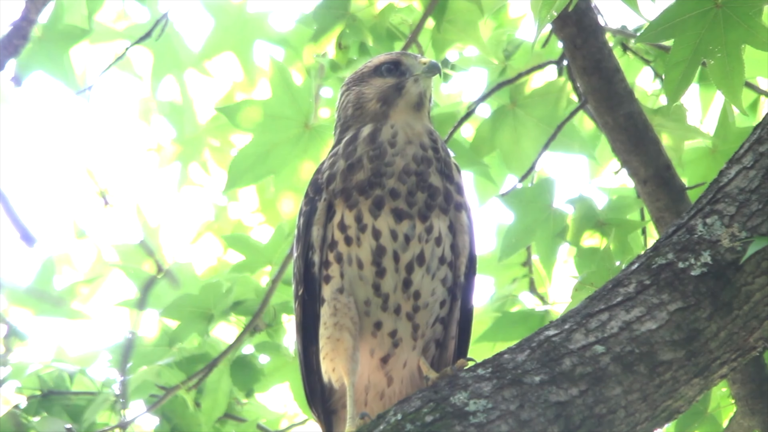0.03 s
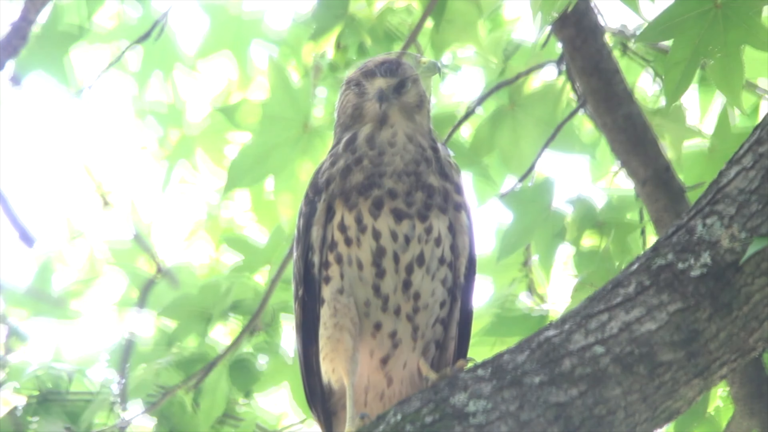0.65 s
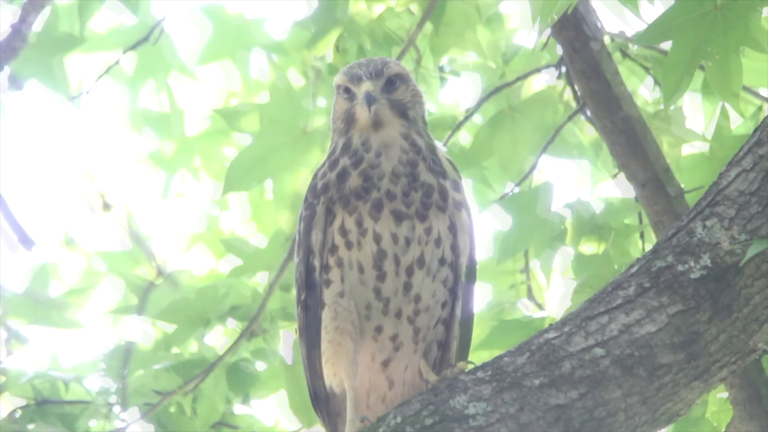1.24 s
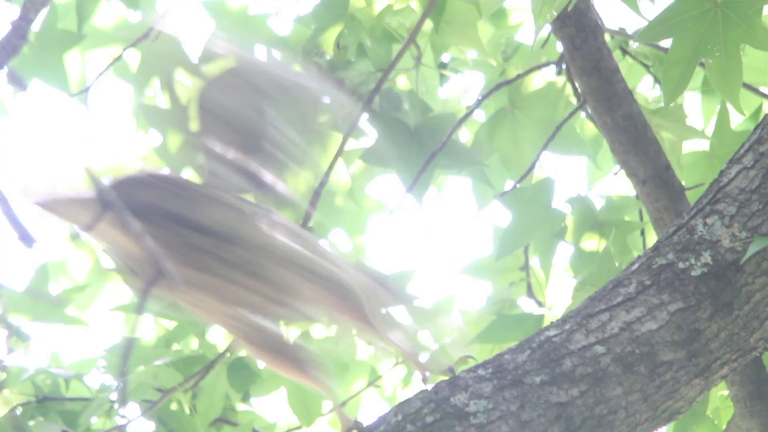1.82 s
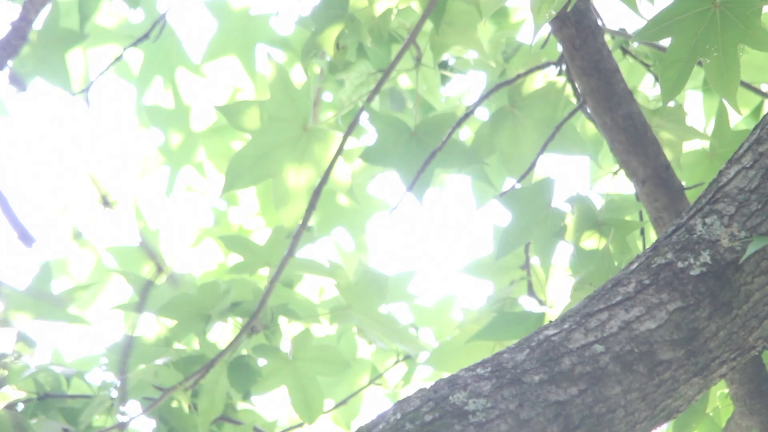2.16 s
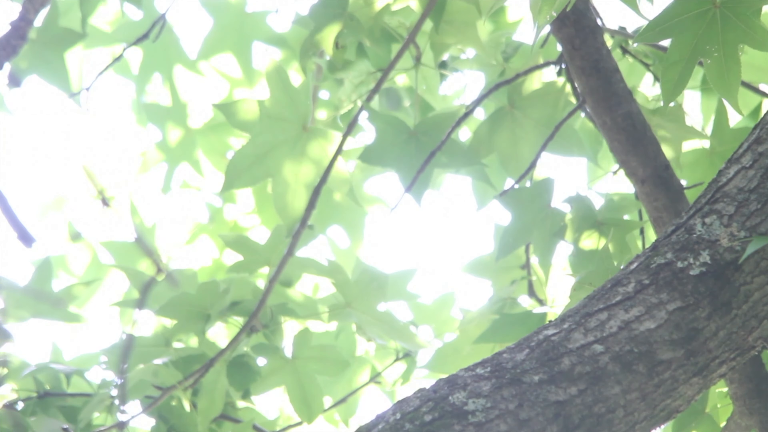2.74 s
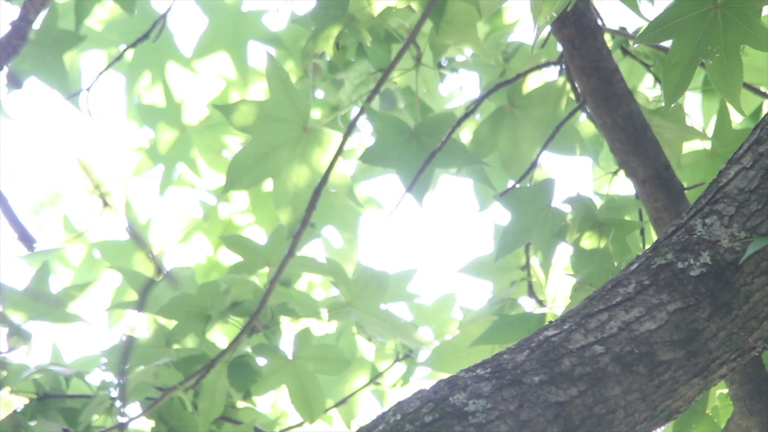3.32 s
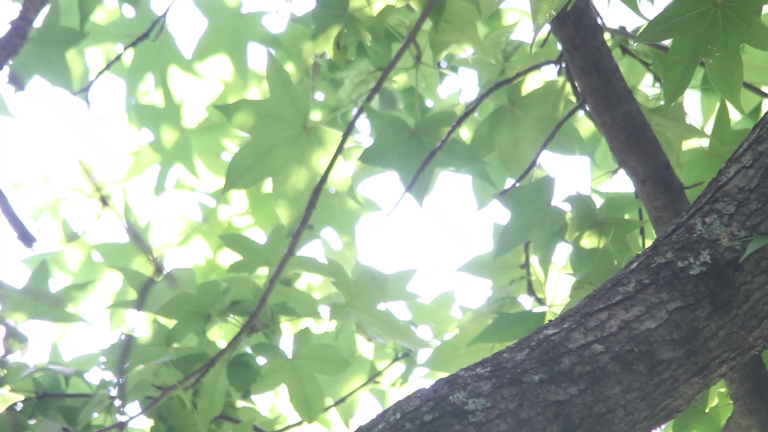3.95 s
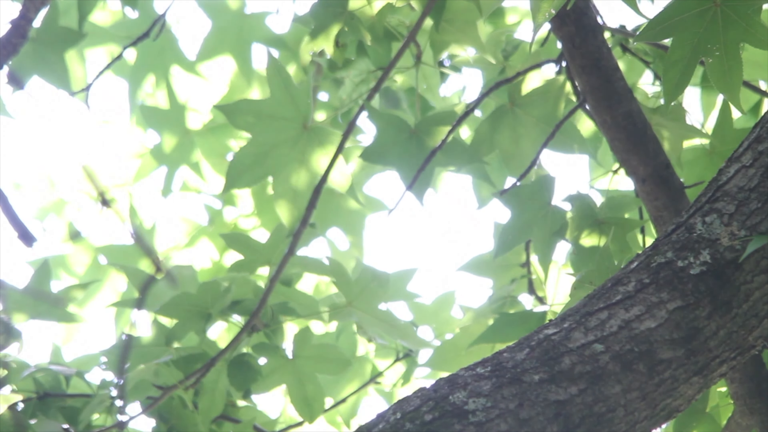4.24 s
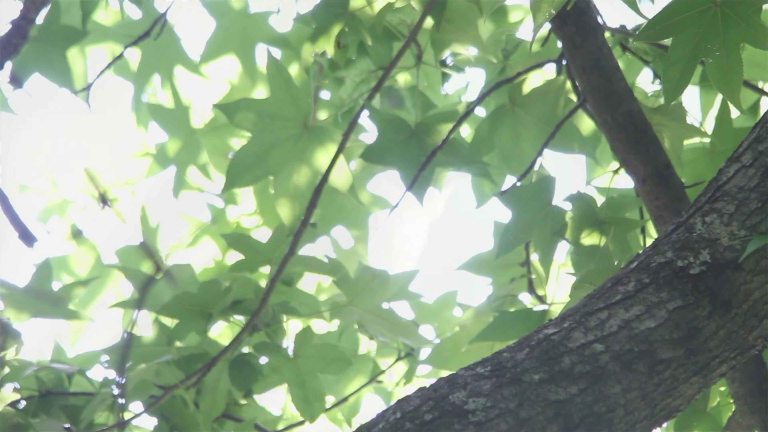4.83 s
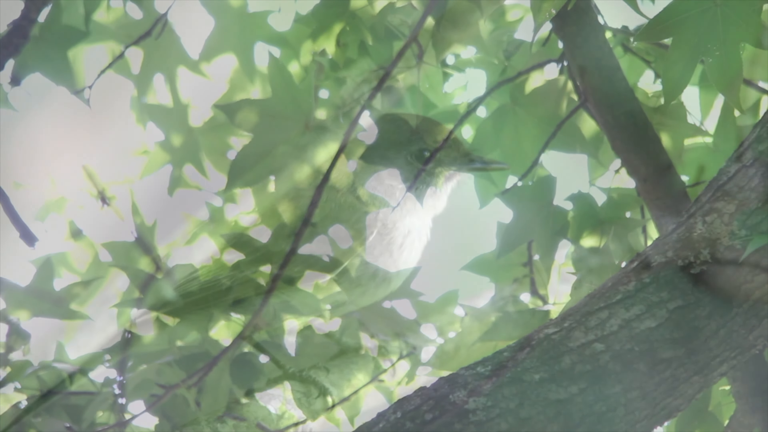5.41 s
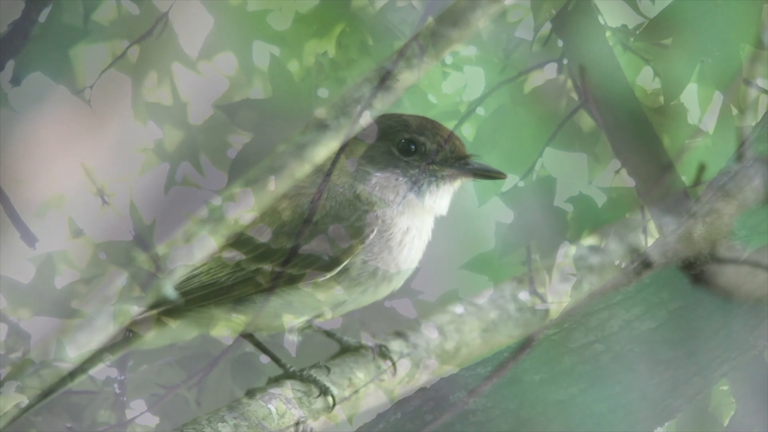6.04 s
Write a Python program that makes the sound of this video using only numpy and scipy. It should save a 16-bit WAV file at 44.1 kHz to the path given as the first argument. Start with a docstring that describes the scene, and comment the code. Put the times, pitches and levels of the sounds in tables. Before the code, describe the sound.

A young hawk calls in echoing woods over a quiet low rumble, a faint whine and a light high hiss. First come far-off cries and two thin falling whistles, the second louder. Five harsh screams follow, much closer to the microphone, each cracking from a high note down to a lower one, with three brief yelps after the first. The fifth scream sounds clearly farther away.

```python
"""Far screams and two thin falling whistles; then a young hawk screams five times in the woods, moving off.
Each scream swoops up, holds, then breaks to a lower register; the syrinx doubles or triples its
period and rasps. The first scream trails off in three low yelps.
Trunks and canopy echo the calls over a low distant rumble, a faint steady whine and a high hiss."""
import sys
import numpy as np
from scipy import signal
from scipy.fft import rfft, irfft, next_fast_len
from scipy.io import wavfile
from scipy.ndimage import uniform_filter1d, map_coordinates

SR = 44100
rng = np.random.default_rng(int(sys.argv[2]) if len(sys.argv) > 2 else 0)


def wav_record(signal):
    """Record a signal, one row per channel, as 16-bit PCM in the file named by sys.argv[1]."""
    frames = np.transpose(np.atleast_2d(signal))
    bounded = np.clip(frames, -1, 1)
    # unit amplitude maps onto the largest positive 16-bit level
    quanta = np.round(bounded * 32767).astype(np.int16)
    wavfile.write(sys.argv[1], SR, quanta)


N = 267907
TIME = np.arange(N) / SR
TOP_HZ = 15700


def amp(db):
    """dB to gain."""
    return 10 ** (np.asarray(db) / 20)


def unit(x):
    """Scale to rms 1."""
    return x / np.sqrt(np.mean(x ** 2) + 1e-20)


def ramp(x):
    """Clip to 0..1."""
    return np.clip(x, 0, 1)


def ease(x):
    """Smooth step, 0 to 1."""
    return np.sin(np.pi / 2 * ramp(x)) ** 2


def bump(x):
    """Gaussian, height 1."""
    return np.exp(-x ** 2 / 2)


def edges(t, edge_s=0.0041):
    """Soft-edged gate."""
    return ramp(np.minimum(t - t[0], t[-1] - t) / edge_s)


def along(points, hz):
    """Interpolate (f/Hz, value) points over log frequency."""
    f, values = np.transpose(points)
    return np.interp(np.log(hz + 1), np.log(f + 1), values)


def span(start_s, end_s):
    """Sample times of a call, and its progress 0..1."""
    t = np.arange(int(start_s * SR), int(end_s * SR)) / SR
    return t, np.linspace(0, 1, len(t))


def wobble(rate_hz, t):
    """Smooth random curve, rate_hz knots a second."""
    coarse = t[::12]
    curve = map_coordinates(rng.standard_normal(1024), [(coarse - t[0]) * rate_hz], mode="wrap")
    return np.interp(t, coarse, curve)


def drift(rate_hz, t):
    """Slow complex noise, rms 1; a narrow band when put on a carrier."""
    return (unit(wobble(rate_hz, t)) + 1j * unit(wobble(rate_hz, t))) / np.sqrt(2)


def noise(spectrum, count=N):
    """Noise of rms 1, coloured by (f/Hz, level/dB) points."""
    size = next_fast_len(count + 8192)
    gain = amp(along(spectrum, np.fft.rfftfreq(size, 1 / SR)))
    return unit(irfft(rfft(rng.standard_normal(size)) * gain, size)[:count])


def woods(level_db=-46):
    """Leaves and distant rumble: broad noise plus a low wandering band."""
    # Rumble and leaf spectrum: f/Hz, level/dB
    spectrum = [(22, -16), (50, 1), (95, 3), (150, 6), (250, 0), (400, -5), (800, -6), (1200, -10.5),
                (2000, -12.5), (3000, -14), (5000, -24), (8000, -29.5), (15500, -34)]
    # Distant drone: t/s, f/Hz, level/dB
    drone_path = [(0, 140, -51), (1.2, 154.5, -49.5), (2.4, 142.4, -63.5), (3.3, 155.7, -51.5),
                  (4.1, 177.1, -46), (4.7, 175.5, -47.5), (6.07, 164.7, -53.5)]
    bed = amp(level_db + 0.3 * wobble(1, TIME)) * noise(spectrum)
    times, *columns = np.transpose(drone_path)
    drone_hz, drone_db = (np.interp(TIME, times, column) for column in columns)
    carrier = np.exp(2j * np.pi * np.cumsum(drone_hz) / SR)
    return bed + np.sqrt(2) * amp(drone_db) * np.real(drift(55, TIME) * carrier)


def whine(level_db=-57, centre_hz=1473):
    """Faint steady tone, slightly wavering."""
    gain = amp(level_db + 0.77 * wobble(11, TIME))
    hz = centre_hz + 5 * wobble(40, TIME)
    return np.sqrt(2) * gain * np.sin(2 * np.pi * np.cumsum(hz) / SR)


def high_hiss(onset_s=.75, level_db=-62.5, edge_s=.025):
    """Faint hiss that sets in and swells in puffs."""
    # Hiss puffs: start/s, length/s, level/dB
    puffs = [(.77, 0.099, -65.5), (0.946, 0.29, -63.5), (1.353, 0.066, -55.5), (1.718, .12, -59.5)]
    gain = amp(level_db) * ease((TIME - onset_s) / edge_s)
    for start_s, length_s, db in puffs:
        inside_s = np.minimum(TIME - start_s, start_s + length_s - TIME)
        gain = np.hypot(gain, amp(db) * ease(inside_s / edge_s + .5))
    spectrum = [(2000, -8), (6000, -6.5), (9800, -10), (11200, -5), (13500, -8.5), (15500, -16.5)]
    return gain * noise(spectrum)


def among_trees(call, start_s, echo_db, near_db=-11, near_t60_s=0.06, build_s=0.0025):
    """A call placed at start_s: direct sound, scatter off nearby limbs, long tail of the wood."""
    # Forest decay: f/Hz, T60/s
    decay = [(300, 0.51), (1500, 0.92), (2500, 0.96), (5000, 1.0), (9000, 0.85), (15000, 0.35)]
    hz, frame_s, frames = signal.stft(rng.standard_normal(SR), SR, nperseg=256)
    frames = frames * amp(-60 * frame_s / along(decay, hz)[:, None])
    t = np.arange(SR) / SR
    tail = signal.istft(frames, SR, nperseg=256)[1][:SR] * (1 - np.exp(-t / build_s))
    near = rng.standard_normal(SR) * amp(-60 * t / near_t60_s) * (t > .003)
    path = amp(echo_db) * tail / np.linalg.norm(tail) + amp(near_db) * near / np.linalg.norm(near)
    path[0] = 1
    return np.pad(signal.fftconvolve(call, path), (round(start_s * SR), N))[:N]


def breath(phase, high, rasp, push, hiss_db, rasp_db=-11, low_share=0.59):
    """Air escaping in one puff a cycle: rasp in the throat, hiss at the beak."""
    # Throat turbulence: f/Hz, level/dB
    throat_air = [(500, -29), (1100, -16), (1500, 0.5), (1850, -13), (2400, -17), (2900, -7), (3350, -3.5),
                  (3800, -2.5), (4300, -3), (5400, -9), (6500, -5), (8200, -25), (11500, -28.5),
                  (15500, -53)]
    # Air past the open beak: f/Hz, level/dB
    beak_air = [(4000, -36), (7000, -46), (9500, 2), (11500, 7), (13500, 8), (15500, -6)]
    turbulence = rasp * (high + low_share * (1 - high)) + push
    throat = amp(rasp_db) * turbulence * noise(throat_air, len(phase))
    beak = amp(hiss_db - 4 - 2 * high) * (1 - push) * noise(beak_air, len(phase))
    return (throat + beak) * (1 + 0.59 * np.cos(phase))


def voice(t, pitch_hz, db, rasp, split, treble_db_oct, hiss_db, root_db=0, shrill_db=0,
          onset_db=5, onset_s=0.029, spent_s=0.041):
    """Syrinx harmonics through the throat; strain shakes the tone, splits its period and adds hiss."""
    # Throat and open beak response: f/Hz, gain/dB
    throat = [(800, -20.5), (970, -15), (1250, -12), (1600, -13.5), (1950, 0), (2450, 4.5), (3250, -6),
              (3750, -18), (4800, -16.5), (5600, -25.5), (6400, -16.5), (9300, -36.5), (11500, -49),
              (15500, -49)]
    break_hz, resonance_hz, fray_hz, shrill_hz = 1380, 2700, 7500, 9100
    effort_s, attack_s, jitter, waver = .08, 0.024, .006, 0.0067
    effort_db, rasp = uniform_filter1d([db, rasp], int(effort_s * SR), mode="nearest")
    surge_db = db - effort_db + 2.2 * wobble(47.7, t) + 2 * rasp * wobble(203.3, t)
    high = ramp(.5 + (pitch_hz - break_hz) / 120)  # 1: hoarse high register, 0: clearer low one
    hoarse = rasp * (high + .14 * (1 - high))
    fall_per_s = -np.gradient(np.log(pitch_hz)) * SR
    crack = uniform_filter1d(np.clip(fall_per_s / 11, 0, 2), 256)  # fast drops crack the voice
    push = np.exp(-(t - t[0]) / onset_s)  # first air: bright, unsteady
    spent = np.exp(-(t[-1] - t) / spent_s)  # air running out
    strain = rasp + 2 * push + 4 * spent
    hz = pitch_hz * (1 + jitter * strain * wobble(450, t) + waver * wobble(110.1, t))
    phase = 2 * np.pi * np.cumsum(hz) / SR

    def partial(k):
        """Line at k times the pitch: surges on the throat resonance, fades at random off it."""
        line_hz = k * pitch_hz
        resonant = np.exp(-np.log2(line_hz / resonance_hz) ** 2 / .25)
        level_db = effort_db + resonant * surge_db + (1 - resonant) * 3 * wobble(32.4, t)
        level_db += along(throat, line_hz) + treble_db_oct * np.log2(k / 2)
        level_db += root_db * (k == 1) + onset_db * push * (2 < k < 6)
        level_db += shrill_db * ease((line_hz - shrill_hz) / 2000 + .5)
        gain = np.sqrt(2) * amp(level_db) * (line_hz < TOP_HZ) / np.hypot(1, crack * k / 4)
        # Uneven cycles fray the line into a band, high lines most.
        fray = .9 * hoarse * min(k / 2, 1) + spent + line_hz ** 2 / (line_hz ** 2 + fray_hz ** 2)
        line = np.exp(1j * rng.uniform(0, 2 * np.pi)) + fray * drift(400 + 15 * k, t)
        return gain * np.real(line * np.exp(1j * k * phase)) / np.hypot(1, fray)

    # Period doubles in the high register, triples in the low.
    lowest = np.arange(1, 6)
    halves = amp(-8) * high * sum(map(partial, lowest + 1 / 2))
    thirds = amp(-8.5) * (1 - high) * sum(map(partial, np.r_[lowest + 2 / 3, lowest + 4 / 3]))
    tone = sum(map(partial, range(1, 12))) + split * (halves + thirds)
    air = amp(effort_db) * breath(phase, high, rasp, push, hiss_db)
    return edges(t) * ramp((t - t[0]) / attack_s) * (tone + air)


def far_screams():
    """Tails of distant screams, sagging and fading."""
    # Far calls: start/s, end/s, first f/Hz, last f/Hz, level/dB, fade/dB, rasp/0-1
    calls = [(0, .5, 1551, 1314, -46.5, 12.5, 0.17), (.62, 0.98, 1580, 1320, -56.5, 7, 0.5)]
    track = np.zeros(N)
    for start_s, end_s, first_hz, last_hz, db, fade_db, rasp in calls:
        t, progress = span(start_s, end_s)
        pitch_hz = last_hz + (first_hz - last_hz) * (1 - progress) ** 2.5
        call = voice(t, pitch_hz, db - fade_db * progress, np.full(len(t), rasp), split=0.04,
                     treble_db_oct=-2.5, hiss_db=-50, onset_db=-21)
        track += among_trees(call, start_s, echo_db=-4.5)
    return track


def whistle(t, pitch_hz, db, waver=0.0055, fray=0.038, chip_s=0.022, flutter_db=2.5):
    """Harsh chip, then a nearly pure tone."""
    # Whistle partials: harmonic number, level/dB
    harmonics = [(1, -2.5), (4, -40), (6, -35)]
    phase = 2 * np.pi * np.cumsum(pitch_hz * (1 + waver * wobble(222, t))) / SR
    tone = np.zeros(len(t))
    for k, level_db in harmonics:
        line = (1 + fray * drift(400, t)) * np.exp(1j * k * phase)
        tone += np.sqrt(2) * amp(level_db) * (k * pitch_hz < 13500) * np.real(line)
    chip = noise([(2400, -48), (3000, 0), (3600, -11), (4000, -14), (4600, -45)], len(t))
    chip *= amp(-1) * np.exp(-(t - t[0]) / chip_s)
    return edges(t) * amp(db + flutter_db * wobble(78.2, t)) * (tone + chip)


def whistles(chip_hz=937, drop_s=.006, resonance_hz=2087, steady_share=0.32, release_s=0.1):
    """Each falls in two flattening slides joined at a knee, and flares through a resonance."""
    # Whistles: start/s, knee/s, end/s, top f/Hz, knee f/Hz, last f/Hz, first slide exponent,
    # first level/dB, knee level/dB
    calls = [(0.409, 0.675, .96, 2960, 2234, 1593, 1.6, -49.5, -41.5),
             (1.152, 1.431, 1.644, 2990, 2194, 1560, 3.1, -34, -36.5)]
    track = np.zeros(N)
    for start_s, knee_s, end_s, top_hz, knee_hz, last_hz, bend, first_db, knee_db in calls:
        t, _ = span(start_s, end_s)
        before = ramp((knee_s - t) / (knee_s - start_s))
        after = ramp((end_s - t) / (end_s - knee_s))
        height = steady_share * before + (1 - steady_share) * before ** bend
        pitch_hz = last_hz + (knee_hz - last_hz) * after ** 1.3 + (top_hz - knee_hz) * height
        pitch_hz += chip_hz * np.exp(-(t - start_s) / drop_s)
        flare_db = 7.5 * bump((pitch_hz - resonance_hz) / 45)
        release_db = 12 * ramp(1 - (end_s - t) / release_s)
        db = knee_db + (first_db - knee_db) * before + flare_db - release_db
        track += among_trees(whistle(t, pitch_hz, db), start_s, echo_db=-9.5)
    return track


def yelps():
    """Short low notes after the first scream; each holds, then droops."""
    # Yelps: start/s, end/s, crest f/Hz, last f/Hz, level/dB, rasp/0-1, treble/(dB/oct)
    calls = [(2.574, 2.678, 960, 726, -31, 1, -4.5), (2.705, 2.77, 744, 701, -37.5, 1, -2.5),
             (2.763, 2.872, 793, 694, -35.5, 0, 1)]
    track = np.zeros(N)
    for start_s, end_s, crest_hz, last_hz, db, rasp, treble_db_oct in calls:
        t, progress = span(start_s, end_s)
        pitch_hz = crest_hz + (last_hz - crest_hz) * progress ** 5.4
        call = voice(t, pitch_hz, np.full(len(t), db), np.full(len(t), rasp), split=0.3,
                     treble_db_oct=treble_db_oct, hiss_db=-26.5, onset_s=.012, spent_s=0.03)
        track += among_trees(call, start_s, echo_db=-10.5)
    return track


def scream_contour(start_s, break_s, end_s, crest_hz, brink_hz, low_hz, last_hz, lift_hz,
                   accent_db, swell_db, high_db, low_db, high_rasp, low_rasp, split):
    """Voice controls for one scream: swoop to the crest, break, tiring low register."""
    # Brief falters on the crests: t/s, pitch drop/Hz, level drop/dB
    falters = [(2.245, 37.5, 3), (3.229, 44.5, -6), (3.99, 85.5, 0.5), (4.68, -0.5, 4.5)]
    start_hz, swoop_s, crest_end_s, settle_s = 1287, .09, .13, .065
    crack_hz, crack_s, attack_s, release_s = 326, 0.019, 0.054, 0.058
    t, _ = span(start_s, end_s)
    age_s = t - start_s
    swoop = ramp(age_s / swoop_s)
    broken = ease((t - break_s) / .02 + .5)
    late = ramp((t - break_s) / (end_s - break_s))
    swell = bump((t - break_s - .1) / .03)

    def registers(high, low):
        """Crossfade at the break."""
        return high + broken * (low - high)

    upper_hz = start_hz + (crest_hz - start_hz) * np.sin(np.pi / 2 * swoop)
    upper_hz += (brink_hz - crest_hz) * ease((age_s - crest_end_s) / settle_s)
    # Opening crack: shoots from below the pitch to above it.
    upper_hz += crack_hz * (2 * age_s / crack_s - 1) * (1 - ease((age_s - crack_s) / 0.00399))
    lower_hz = low_hz + (last_hz - low_hz) * late ** 2.2 + lift_hz * swell
    pitch_hz = registers(upper_hz, lower_hz) * (1 + registers(.016, .006) * wobble(50, t))
    opening_db = accent_db * bump((age_s - 0.02) / 0.023) - 8.5 * (1 - ramp(age_s / attack_s))
    closing_db = swell_db * swell - 8.5 * late ** 2 - 6 * ramp(1 - (end_s - t) / release_s)
    for at_s, drop_hz, drop_db in falters:
        falter = bump((t - at_s) / .013)
        pitch_hz -= drop_hz * falter
        opening_db -= drop_db * falter
    db = registers(high_db + opening_db, low_db + closing_db)
    tired = 1 + 0.64 * (2 * late - 1)
    rasp = ramp(registers(1 + (high_rasp - 1) * ease(swoop), low_rasp * tired))
    return t, pitch_hz, db, rasp, split * registers(0.39, 2 * late * tired)


def hawk_screams():
    """Five screams, each on its own path through the trees."""
    # Screams: start/s, break/s, end/s, crest f/Hz, pre-break f/Hz, low f/Hz, last f/Hz, swell lift/Hz,
    # accent/dB, swell/dB, high level/dB, low level/dB, high rasp/0-1, low rasp/0-1, splitting/0-1,
    # fundamental/dB, treble/(dB/oct), shrill overtones/dB, echo/dB, beak hiss/dB
    calls = [(2.11, 2.311, 2.572, 1694, 1700, 1240, 1148, 46, -2.5, 5, -19, -26.5, 0.34, 0.62, 0.38, -3, .5, 11, -6, -30),
             (3.116, 3.352, 3.62, 1579, 1309, 1229, 1099, 10.5, -1.5, -1, -21, -24, 0.2, 1, 0.32, -2.5, 0.1, 2.5, -9.5, -29.5),
             (3.826, 4.044, 4.315, 1582, 1530, 1254, 1158, 5.5, 6, -1, -19.5, -24, 0.25, 1, 0.31, -0.5, 1, 4, -7.5, -32),
             (4.557, 4.755, 5.12, 1583, 1523, 1230, 1109, -16.5, 4.5, 7, -23, -32.5, 0.25, 1, 0.16, -1, 0.4, 3.5, -5, -40),
             (5.353, 5.559, 5.94, 1583, 1598, 1249, 1139, -14, 8, -0.5, -34, -40.5, 0.8, 1, 0.32, -2.5, -1.5, 3, -2.5, -26)]
    track = np.zeros(N)
    for start_s, *shape, root_db, treble_db_oct, shrill_db, echo_db, hiss_db in calls:
        call = voice(*scream_contour(start_s, *shape), treble_db_oct, hiss_db, root_db, shrill_db)
        track += among_trees(call, start_s, echo_db)
    return track


def scene():
    """Calls over the sound of the wood, mono."""
    calls = hawk_screams() + yelps() + far_screams() + whistles()
    return (calls + woods() + whine() + high_hiss())[None]


def record(dry):
    """Brick-wall low-pass at TOP_HZ."""
    size = next_fast_len(N + SR // 2)
    passband = np.fft.rfftfreq(size, 1 / SR) < TOP_HZ
    return irfft(rfft(dry, size) * passband, size)[:, :N]


dry = scene()
out = record(dry)
wav_record(out)
```